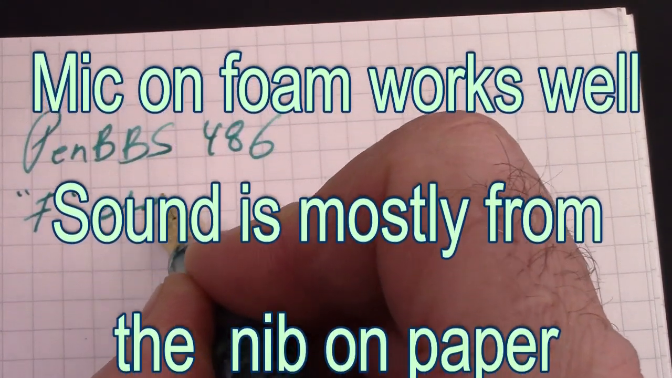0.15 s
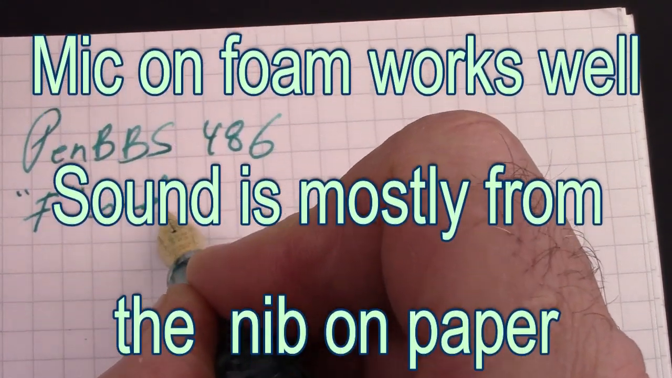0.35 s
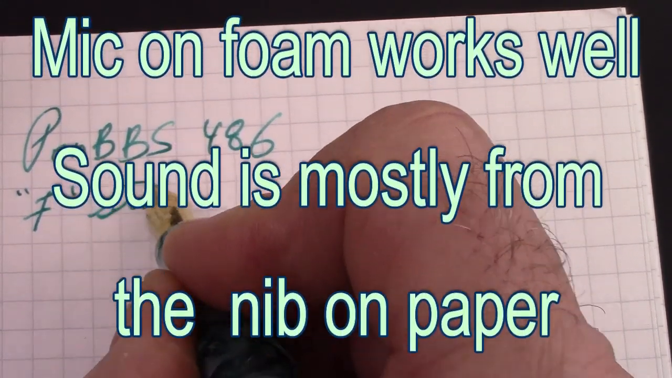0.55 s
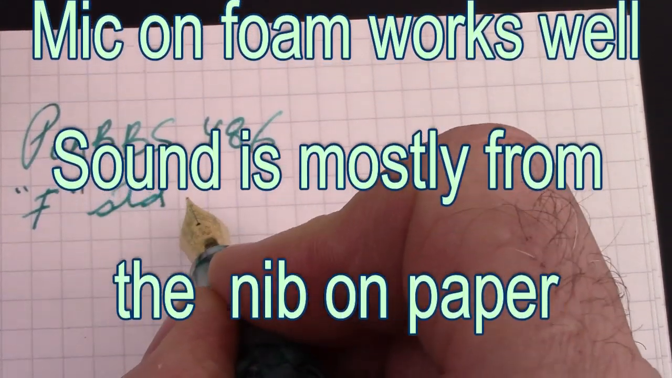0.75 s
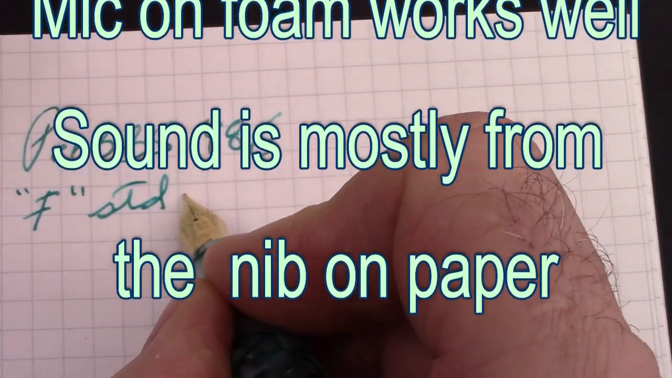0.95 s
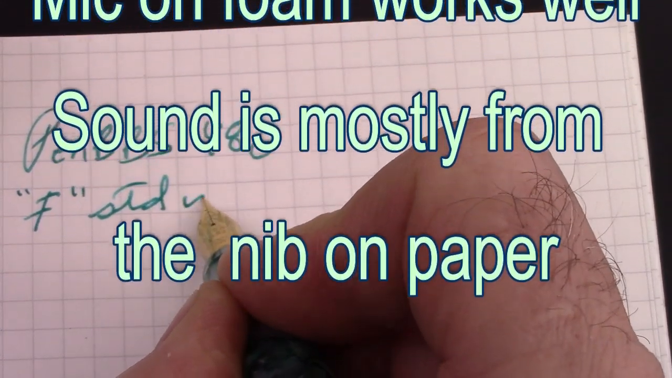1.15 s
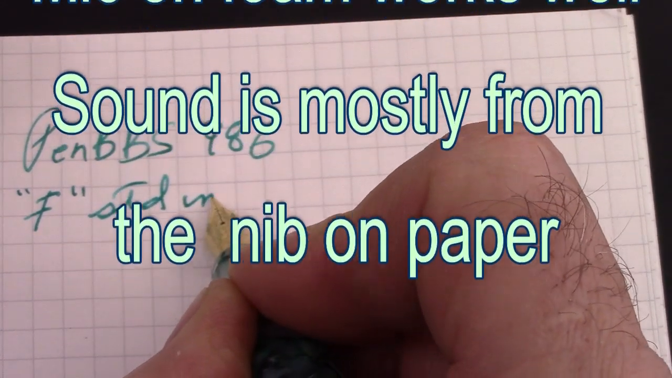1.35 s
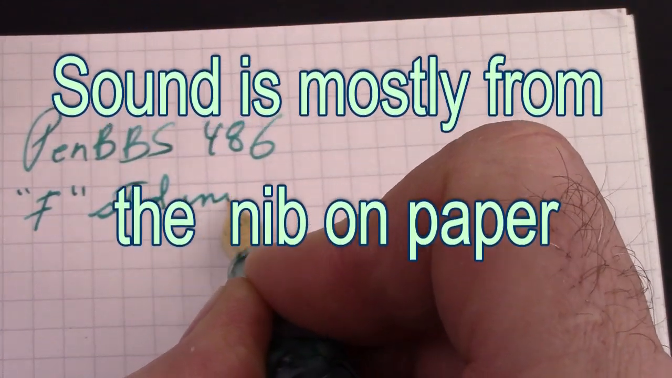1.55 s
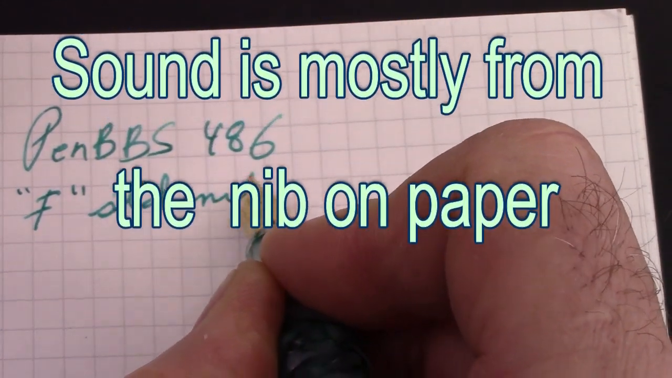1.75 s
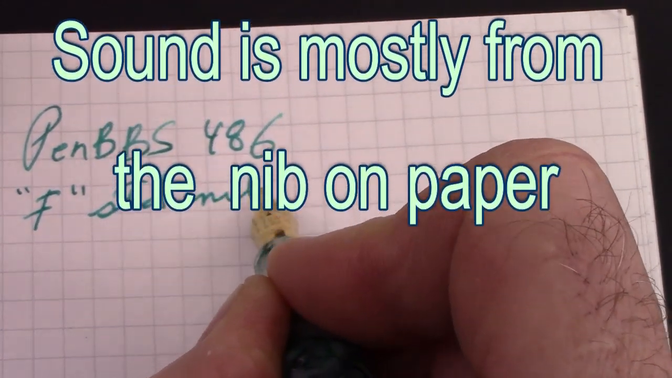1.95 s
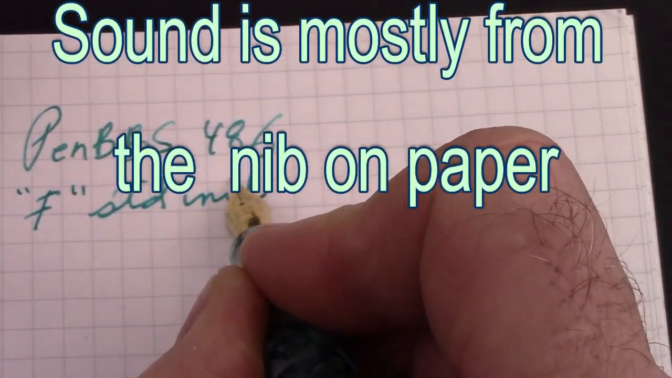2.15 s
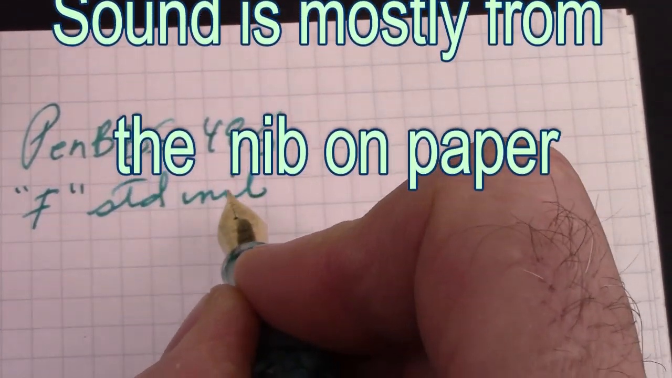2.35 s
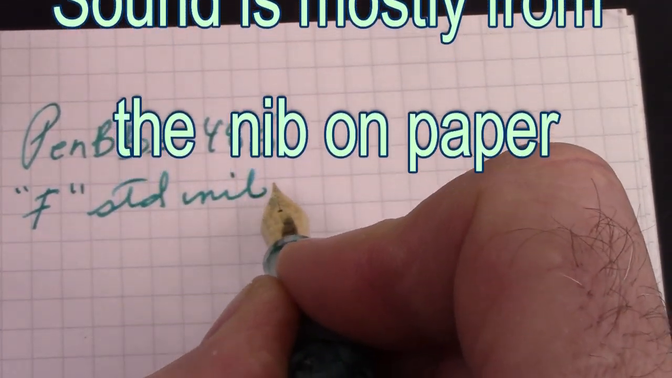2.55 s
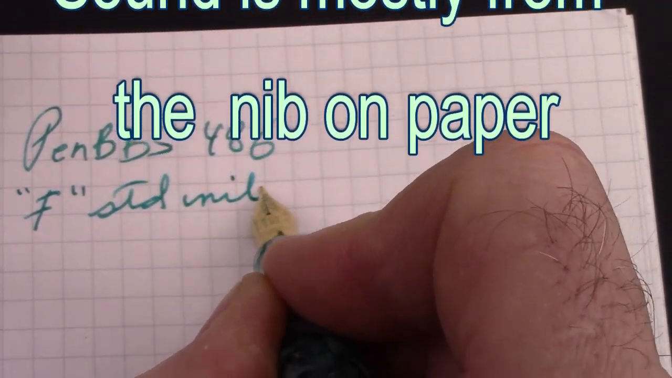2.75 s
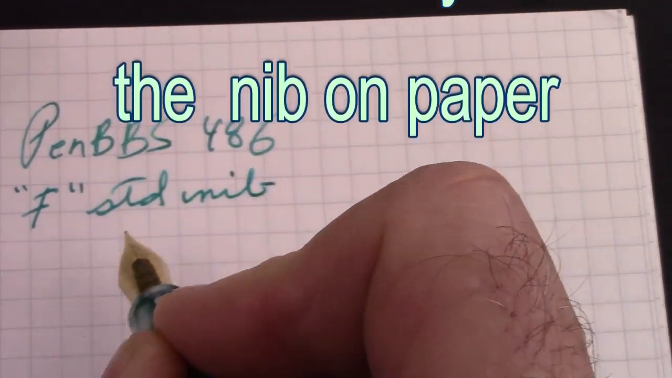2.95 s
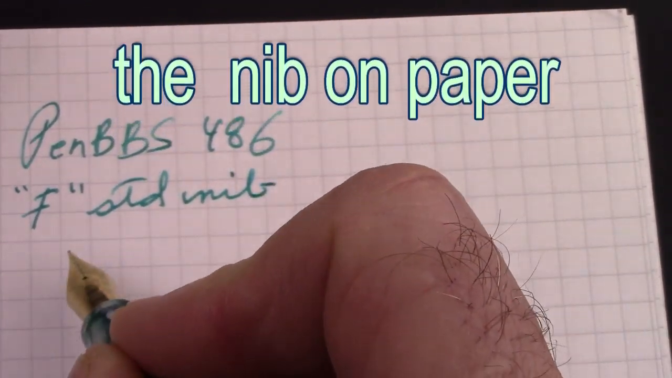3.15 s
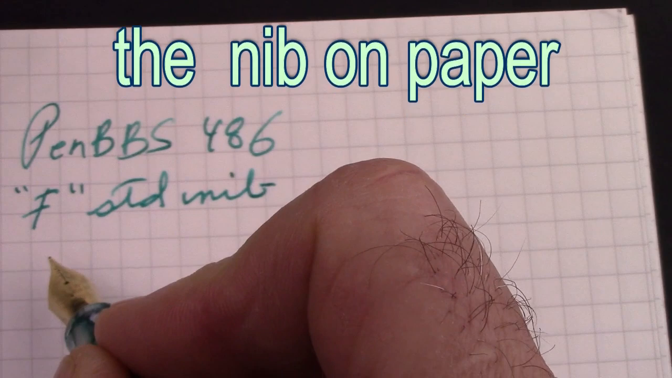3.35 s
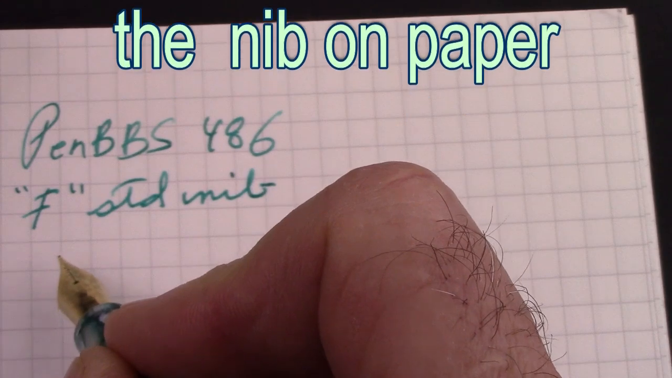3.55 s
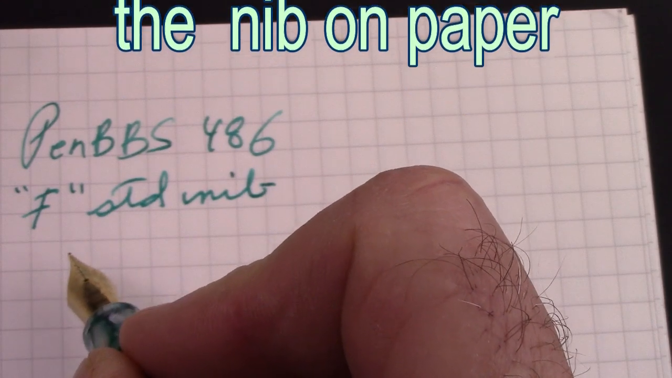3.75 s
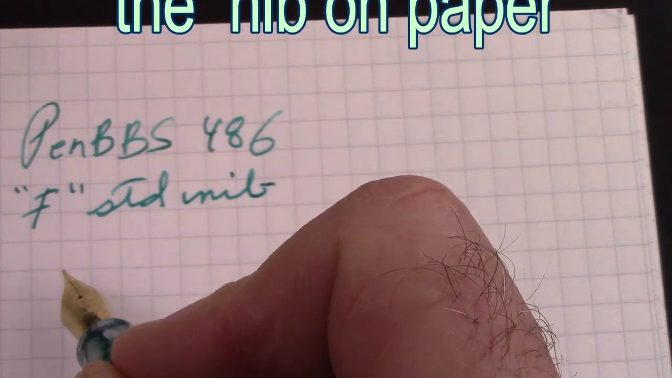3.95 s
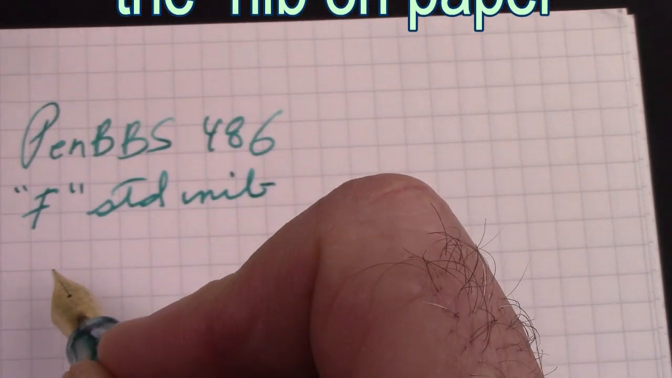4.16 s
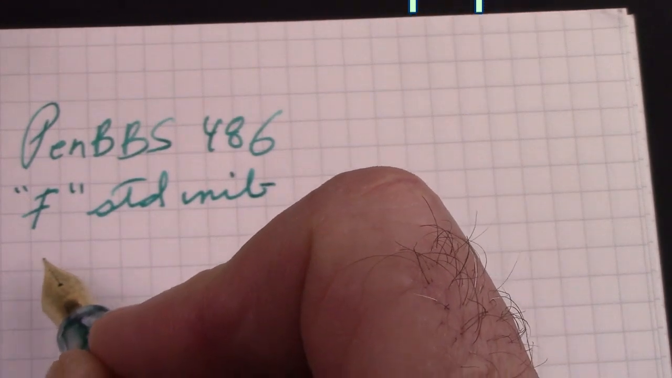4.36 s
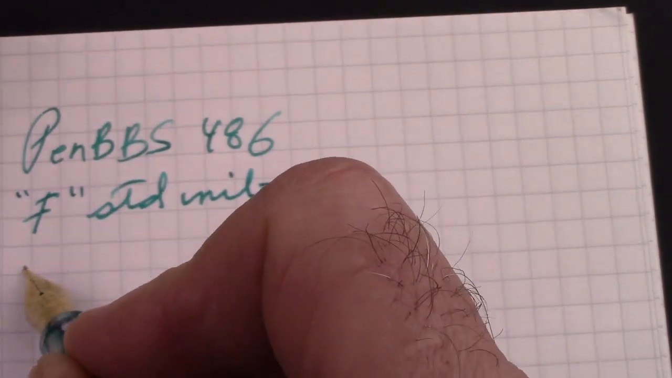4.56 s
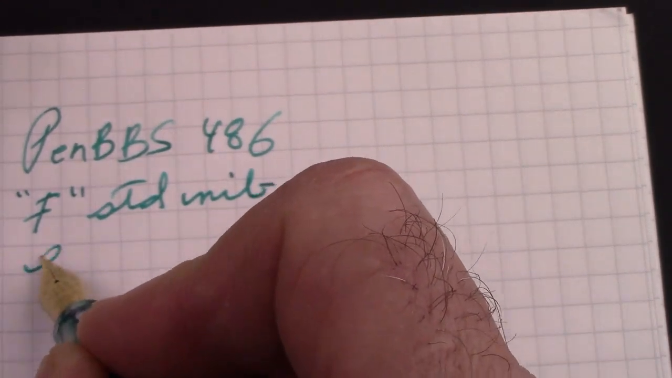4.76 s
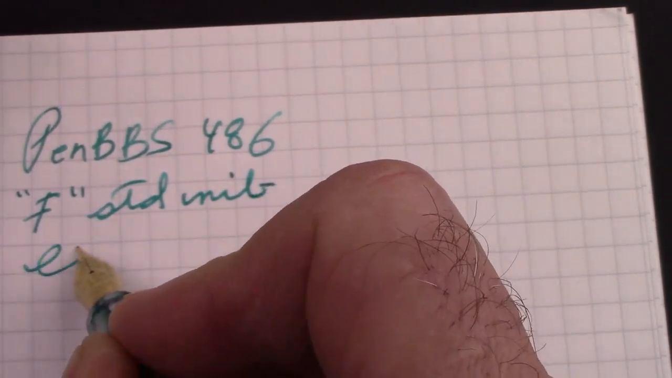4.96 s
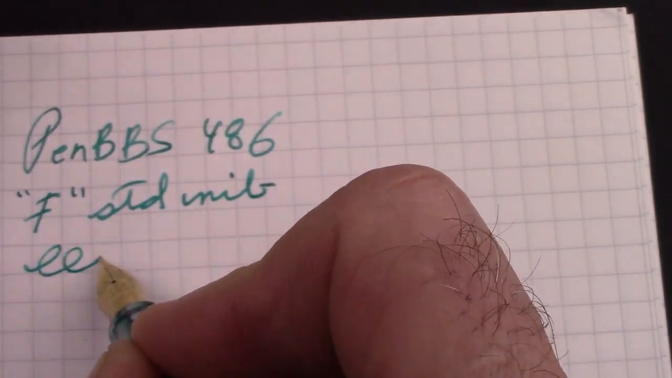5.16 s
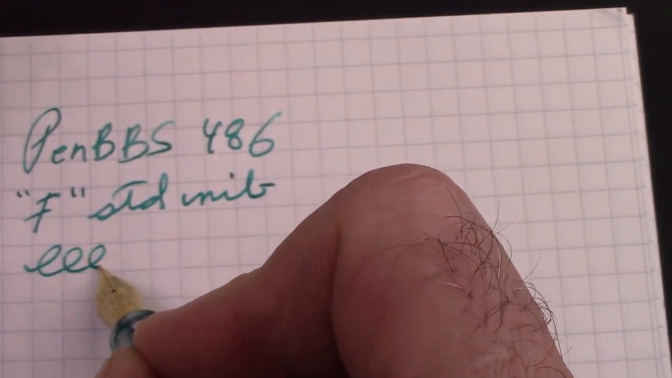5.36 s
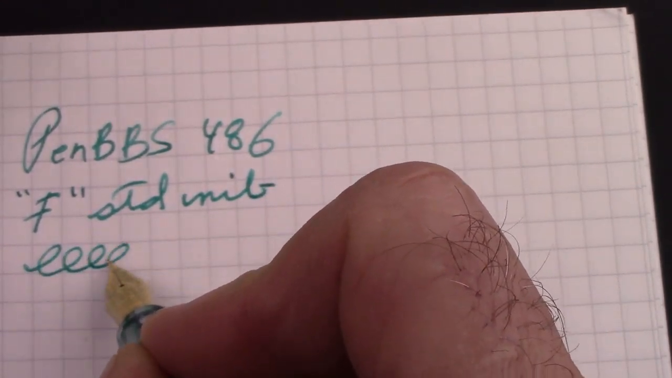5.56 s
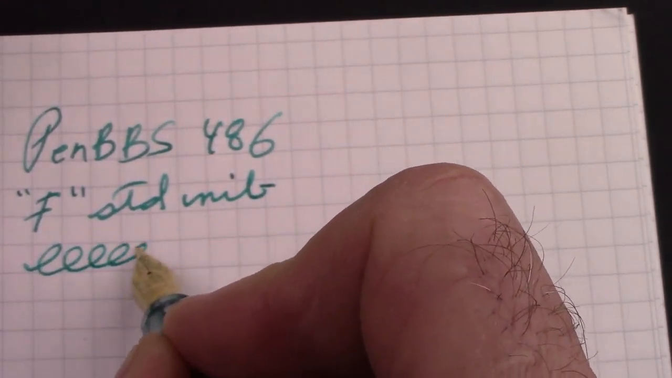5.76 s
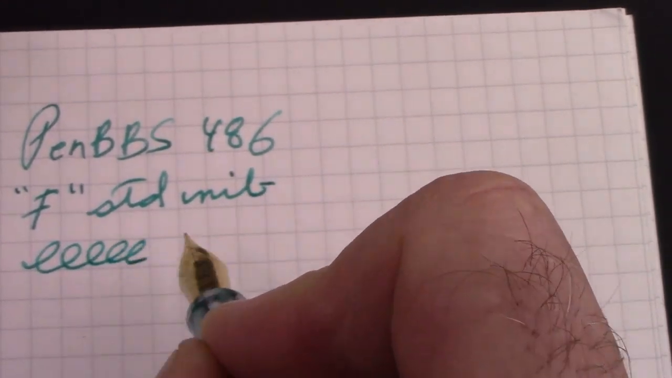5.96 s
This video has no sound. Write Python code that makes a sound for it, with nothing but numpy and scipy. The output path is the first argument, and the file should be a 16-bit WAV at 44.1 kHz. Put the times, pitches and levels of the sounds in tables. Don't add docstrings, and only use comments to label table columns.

```python
import sys
import numpy as np
from scipy import signal
from scipy.fft import rfft, irfft
from scipy.io import wavfile
from scipy.ndimage import uniform_filter1d, map_coordinates

SR = 44100
rng = np.random.default_rng(int(sys.argv[2]) if len(sys.argv) > 2 else 0)


def amplitude_ratio(level_db):
    exponent = np.asarray(level_db, float) / 20
    return 10 ** exponent


def materialize(psi):
    bounded = np.clip(np.atleast_2d(psi).T, -1, 1)
    quanta = np.round(bounded * 32767).astype(np.int16)
    wavfile.write(sys.argv[1], SR, quanta)


N = 264600
T = np.arange(N) / SR
COARSE = T[::40]


def level(x, db):
    return x * amplitude_ratio(db) / np.sqrt(np.mean(x ** 2))


def ring(x, hz, width_hz):
    return signal.lfilter(*signal.iirpeak(hz, hz / width_hz, fs=SR), x)


def walk(rate_hz):
    steps = rng.standard_normal(2000)
    curve = map_coordinates(steps, [COARSE * rate_hz], order=2, prefilter=False)
    return np.interp(T, COARSE, curve) * 1.356


def body(x, modes, patchy_db=0., rate_hz=12):
    out = np.zeros(N)
    for k, (hz, width_hz, db) in enumerate(modes):
        gain = amplitude_ratio(db + patchy_db * walk(rate_hz))
        out += (-1) ** k * gain * ring(x, hz, width_hz)
    return out


def colour(x, points):
    hz, db = np.transpose(points)
    bins_hz = np.maximum(np.fft.rfftfreq(N, 1 / SR), 1)
    gain_db = np.interp(np.log(bins_hz), np.log(hz), db)
    return irfft(rfft(x) * amplitude_ratio(gain_db), N)


def smooth(gains):
    return [np.interp(T, COARSE, g) for g in gains]


def swells(start_s, hold_s, peaks_db, rise_db_s, fall_db_s, bend_db_s2=0.):
    early = np.maximum(start_s[:, None] - COARSE, 0)
    late = np.maximum(COARSE - (start_s + hold_s)[:, None], 0)
    drop_db = rise_db_s * early + fall_db_s * late + bend_db_s2 * (early + late) ** 2
    return np.sqrt(amplitude_ratio(2 * np.array(peaks_db)) @ amplitude_ratio(-2 * drop_db))


def air():
    # frequency in Hz, level in dB per Hz
    floor = [(47, -24), (80, -2.5), (109, -14), (189, -15), (295, -22.5), (351, -19.5), (713, -26.5),
             (971, -28), (2200, -32.5), (5560, -36), (12900, -41), (15700, -46.5)]
    hiss = colour(rng.standard_normal(N), floor)
    return level(amplitude_ratio(.5 * walk(9.8)) * hiss, -48.5)


def fan():
    # frequency in Hz, unsteadiness (x 0.5 dB), level in dB
    hum = [(61.06, 1.5, -43), (122.5, 5.4, -52), (183, 4.0, -58.5), (70.7, 5.0, -49), (1177, 3.7, -72.5)]
    turn_s = np.cumsum(1 + 0.01098 * walk(6)) / SR
    out = np.zeros(N)
    for hz, swell, db in hum:
        clock_s = turn_s if hz < 500 else T
        gain = np.sqrt(2) * amplitude_ratio(db + 0.5 * swell * walk(6.9))
        out += gain * np.sin(2 * np.pi * hz * clock_s)
    return out


def cricket():
    # first chirp in seconds, chirp count, period in seconds, level in dB
    phrases = [
        (.04, 4, .137, -2),
        (.75, 7, .163, -4),
        (1.98, 1, .14, -3),
        (2.21, 3, .14, 0),
        (2.63, 2, .135, -5),
        (2.95, 8, .134, 0),
        (4.02, 3, .134, -5),
        (4.43, 3, .134, -1),
        (4.99, 3, .145, -1),
        (5.73, 2, .15, -1),
    ]
    pulse = np.zeros(len(COARSE))
    for s, count, period_s, db in phrases:
        for k in range(count):
            away_s = abs(COARSE - s - k * period_s)
            pulse += amplitude_ratio(db) * np.clip((.045 - away_s) / 0.015, 0, 1)
    tone = np.sin(2 * np.pi * 5566 * T + 0.78 * walk(36))
    return amplitude_ratio(-64 + .4 * walk(6.8)) * smooth([pulse])[0] * tone


def arm(push):
    # start in seconds, sway in dB, foam bounce in dB, desk top flex in dB
    jolts = [(.15, -39, -45, -32), (0.499, -33, -49, -27.5), (.95, -33, -34, -59), (1.03, -44, -47, -32),
             (.75, -46, -34, -55), (1.2, -38, -39, -45), (1.35, -36, -33, -38.5), (1.48, -44, -33, -47),
             (1.6, -53, -32, -65), (1.8, -54, -33.5, -53), (1.99, -56, -29, -46), (2.08, -30.5, -44, -33),
             (2.16, -44.5, -32, -58), (2.52, -39, -32, -40), (2.38, -43, -38, -37),
             (2.7, -40.5, -33.5, -54), (2.8, -37.5, -46, -38), (3.27, -56, -40, -64), (4.51, -43, -46, -59),
             (4.68, -52, -33, -68), (5.651, -56, -56, -32), (5.8, -38, -37, -46), (5.93, -49, -50, -29.5)]
    still_db, writing_db, lag_s = (-55, -46, -50), (-6, 3, -1), 0.13
    start_s, *peaks_db = np.transpose(jolts)
    jolted = swells(start_s, 0 * start_s, peaks_db, rise_db_s=141, fall_db_s=147)
    lagged = uniform_filter1d(push, size=int(lag_s / COARSE[1]))
    writing = amplitude_ratio(np.array(writing_db))[:, None] * lagged
    return np.hypot(np.hypot(jolted, writing), amplitude_ratio(np.array(still_db))[:, None])


def desk(sway, bounce, flex):
    # start in seconds, peak in dB, push length in seconds, foam rebound in dB
    thumps = [
        (.454, -8.5, .011, -12),
        (.479, -14, .018, -12),
        (.909, -21, .016, 0),
        (1.946, -26, .008, 16),
        (2.052, -15, .011, 4),
    ]
    # frequency in Hz, width in Hz, level in dB
    thud = [(24.6, 9.6, -9.5), (100, 24, -4)]
    push, foam_push = np.zeros(N), np.zeros(N)
    for s, db, length_s, rebound_db in thumps:
        blow = amplitude_ratio(db) * np.sin(np.pi * np.clip((T - s) / length_s, 0, 1)) ** 2
        push += blow
        foam_push += amplitude_ratio(rebound_db) * blow
    rebound = ring(foam_push, 77.0, 13.4)
    rock = level(ring(ring(sway * rng.standard_normal(N), 36.0, 33.0), 41.0, 37.0), -41.0)
    foam_modes = [(67.3, 12.8, 0.5), (78.1, 13.3, -3.0)]  # Hz, width Hz, dB
    foam = level(body(bounce * rng.standard_normal(N), foam_modes), -40.0)
    board = level(ring(ring(flex * rng.standard_normal(N), 103.5, 42.0), 154.0, 72.0), -45.0)
    thump = push - ring(push, 7.6, 37.0) + body(push, thud) + rebound
    return rock + foam + board + thump


def knocks():
    # start in seconds, peak in dB, pitch in Hz, 60 dB decay in seconds
    hits = [(0.092, -40, 221, 0.079), (0.319, -43, 328, 0.017), (0.364, -25, 201, 0.028),
            (0.447, -25.5, 195, 0.074), (0.677, -39, 470, 0.032), (.745, -38, 333, 0.023),
            (0.711, -32, 244, 0.023), (0.931, -29.5, 300, 0.021), (1.14, -25.5, 487, 0.03),
            (1.347, -22.5, 476, 0.011), (1.37, -21, 484, 0.011), (1.448, -33, 304, 0.016),
            (1.492, -40.5, 637, 0.046), (1.758, -35, 234, 0.023), (1.789, -28, 215, 0.034),
            (1.946, -32, 138, 0.065), (2.058, -35, 137, 0.048), (1.786, -21.5, 524, 0.013),
            (2.0482, -19.5, 200, 0.02), (2.655, -38.5, 234, 0.03), (2.933, -18, 239, 0.009),
            (3.04, -20.5, 247, 0.0058), (3.229, -29, 202, 0.011), (3.304, -24.5, 332, 0.013),
            (4.466, -27, 272, 0.024), (4.564, -41, 250, 0.032), (4.715, -36.5, 288, 0.065),
            (4.773, -36, 460, 0.032), (5.503, -32, 323, 0.021), (5.741, -33.5, 396, 0.028),
            (5.08, -32.5, 258, 0.11), (5.908, -26.5, 203, 0.023), (5.956, -26.5, 260, 0.0085)]
    out, t = np.zeros(N + SR), T[:4000]
    for s, db, hz, t60_s in hits:
        fade = (1 - np.exp(-t / 0.00097)) * np.exp(-np.log(1000) * t / t60_s)
        tone = np.sin(2 * np.pi * hz * t)
        tone += amplitude_ratio(-10.5) * np.sin(2 * np.pi * 1.66 * hz * t)
        clack_db = -7 + 5 * np.log2(hz / 480)
        tone += amplitude_ratio(clack_db) * np.exp(-t / 0.0012) * np.sin(2 * np.pi * 1150.0 * t)
        out[int(s * SR):][:4000] += amplitude_ratio(db + 6.0) * fade * tone
    return out[:N]


def ticks():
    # start in seconds, peak in dB, centre in Hz, bright edge in dB
    small_touches = [(0.447, -28, 4530, -35.5), (0.6753, -37.5, 3070, -54), (0.747, -41.5, 3240, -62),
                     (0.901, -34.5, 3020, -41.5), (1.013, -45, 3100, -64), (1.1407, -33.5, 4330, -79),
                     (1.3486, -33, 2800, -49), (1.371, -38.5, 3090, -57), (1.4002, -41, 3510, -59),
                     (1.4489, -40.5, 2980, -57), (1.496, -45, 4670, -62), (1.7874, -35, 4130, -52),
                     (1.854, -36.5, 3660, -58), (1.869, -38, 2700, -54), (2.0437, -30, 3920, -36.5),
                     (2.0994, -41, 6890, -54), (2.676, -42, 5770, -55), (2.995, -42, 3200, -64),
                     (3.051, -42, 2680, -53), (3.129, -40, 3500, -52), (3.1747, -38.5, 3020, -45),
                     (3.231, -47, 5400, -66), (3.306, -35.5, 3800, -49), (3.336, -42, 5600, -64),
                     (4.437, -35, 3740, -37), (4.4668, -38, 4440, -49), (4.497, -48, 3000, -72),
                     (5.106, -31, 3360, -37.5), (5.703, -37.5, 3150, -56), (5.836, -35.5, 3270, -50),
                     (0.933, -41, 890, -67), (1.5637, -43, 1910, -57), (1.748, -40, 1070, -75),
                   (2.0489, -32.5, 960, -48), (2.1234, -43, 1190, -66), (4.249, -43.5, 2030, -66),
                   (4.353, -37.5, 1430, -51), (4.5708, -40, 890, -68), (5.079, -34, 980, -67),
                   (.908, -37.5, 1320, -59), (4.447, -41, 770, -66), (5.9965, -30, 3000, -36),
                     (.0937, -46, 4610, -58), (0.886, -44, 3000, -63), (.915, -44, 3020, -68),
                   (.927, -46, 2300, -60), (1.016, -47, 3900, -64), (1.767, -54, 9000, -55),
                   (1.7853, -43, 1200, -64), (1.8327, -50, 7000, -55), (1.88, -49, 1600, -62),
                   (2.058, -45, 6000, -61), (2.864, -35, 3140, -64), (4.2505, -42.5, 4400, -54),
                   (4.597, -37, 3460, -40), (4.835, -43, 1600, -56), (4.846, -34, 1800, -41),
                   (5.329, -40, 3650, -61), (5.356, -33, 1690, -64), (5.5907, -49, 4620, -58),
                   (5.602, -40, 1500, -48), (5.653, -44, 4800, -66), (5.765, -39, 1680, -66),
                   (5.814, -44, 2500, -62)]
    out, t = np.zeros(N + SR), T[:1500]
    for s, db, hz, edge_db in small_touches:
        noise = rng.standard_normal(1500)
        clatter = (t == 0) + 0.095 * noise ** 2 * np.sign(noise) * np.exp(-t / 0.0031)
        wide = np.clip(1.5 + .04 * (edge_db - db), .45, 1.3)
        mid = ring(ring(clatter, hz, wide * hz), hz, min(2 * wide * hz, .35 * SR))
        edge = ring(ring(clatter * np.exp(-t / .0025), 9500., 12000.), 12500., 14000.)
        touch = amplitude_ratio(db + 5.0) * mid / abs(mid).max() + amplitude_ratio(edge_db + 16) * edge / abs(edge).max()
        out[int(s * SR):][:1500] += touch
    return out[:N]


def pings():
    # start in seconds, peak in dB, pitch in Hz, 60 dB decay in seconds
    flicks = [(.9335, -39, 800, 0.0081), (1.7475, -42, 1100, .01), (4.466, -39, 696, 0.0094),
              (4.249, -45, 1900, .01), (1.8327, -48, 12000, .003), (5.08, -36, 1600, 0.0099),
              (0.4467, -30.5, 1370, 0.0077), (1.7862, -34, 5300, .006), (1.786, -35, 2500, .005),
              (3.162, -46, 990, .008), (3.2315, -46, 5500, .014), (3.2315, -44, 2500, .007),
              (3.306, -39, 1690, .007), (3.318, -46, 3800, .005), (4.4366, -38, 1500, .005),
              (1.076, -45, 1900, .006), (5.389, -42, 3800, .004), (1.011, -44, 2920, .008),
              (1.3483, -36, 2840, .007), (1.4025, -43, 3500, .01), (1.449, -36, 3120, 0.0056),
              (1.4965, -40, 4900, .008), (1.565, -42, 3720, .012), (1.565, -36.5, 1910, 0.012),
              (2.0447, -39, 3600, .007), (2.0495, -40, 1600, .007), (2.0522, -33, 900, 0.0056),
              (2.1225, -34, 1200, 0.0061), (2.6572, -48, 3820, .006), (2.7201, -44.5, 2960, .008),
              (2.762, -45, 3630, .006), (4.4967, -34, 3040, 0.0075), (4.652, -39, 4600, .005),
              (4.846, -34, 3330, 0.009), (4.854, -34, 3340, 0.0093), (5.703, -36.5, 3240, .007)]
    # start in seconds, peak in dB, pitch in Hz
    catches = [(0.092, -40, 1160), (0.127, -31, 1830), (0.14, -29, 1080), (0.225, -45, 759),
               (0.24, -33, 1140), (0.266, -24, 935), (4.571, -22, 904), (4.641, -34, 1630),
               (4.653, -30, 1630), (4.738, -45, 1870), (4.808, -31, 970), (4.821, -33, 1330),
               (4.83, -24, 1620), (4.838, -26, 1660), (4.895, -41, 1650), (4.997, -34, 1630),
               (5.078, -35, 970), (5.145, -38, 1610), (5.27, -33, 1070), (5.335, -37, 1490),
               (5.348, -27, 1740), (5.506, -37, 1750), (5.511, -34, 1180), (5.584, -29, 1020),
               (5.752, -29, 1730), (5.818, -34, 1010), (5.835, -27, 1580)]
    caught = [(s, db - 8, hz, 0.014) for s, db, hz in catches]
    out, t = np.zeros(N + SR), T[:2000]
    for s, db, hz, t60_s in flicks + caught:
        fade = (1 - np.exp(-t / 0.00026)) * np.exp(-np.log(1000) * t / t60_s)
        out[int(s * SR):][:2000] -= amplitude_ratio(db + 5.5) * fade * np.sin(2 * np.pi * hz * t)
    return out[:N]


def played(table, rise_db_s, fall_db_s):
    start_s, hold_s, *peaks_db = np.transpose(table)
    return swells(start_s, hold_s, peaks_db, rise_db_s, fall_db_s, bend_db_s2=6000)


def hand():
    # start in seconds, hold in seconds, push into the pad in dB, fibre scratch in dB
    strokes = [(0.0, 0.038, -41.5, -48.5), (.1, 0.017, -47, -46), (.13, 0.041, -42, -44),
               (.232, 0.049, -36.5, -40.5), (.29, 0.004, -54, -54), (.455, 0.0058, -36, -49),
               (.475, 0.045, -38.5, -43), (.56, 0.017, -44.5, -53), (.62, 0.018, -56, -57),
               (.7, 0.081, -49.5, -56.5), (.91, 0.016, -43, -55), (.96, 0.018, -46.5, -48.5),
               (1.02, .005, -56, -66), (1.055, 0.011, -39, -42.5), (1.14, 0.015, -39.5, -47),
               (1.25, 0.011, -44.5, -48.5), (1.355, 0.013, -42.5, -52), (1.41, 0.017, -43, -51.5),
               (1.5, 0.048, -43, -50), (1.575, 0.053, -38, -46.5), (1.758, 0.021, -36.5, -45),
               (1.795, 0.0043, -36, -42), (1.82, 0.041, -44.5, -49.5), (1.865, 0.0089, -34, -44),
               (1.956, .005, -43.5, -62), (2.055, 0.0065, -39, -49.5), (2.14, 0.11, -51, -54.5),
               (2.776, 0.002, -38.5, -45), (2.868, 0.1, -45, -53), (3.051, .005, -48, -56),
               (3.15, 0.22, -54.5, -56.5), (3.87, 0.083, -56, -57.5), (4.25, 0.029, -54, -74),
               (4.44, 0.036, -46.5, -60)]
    loops = [(4.535, 0.0083, -47, -52), (5.21, .01, -54, -55), (5.46, 0.011, -48, -54),
             (4.59, 0.02, -30.5, -38.5), (4.64, 0.025, -39, -42), (4.74, 0.036, -42, -44.5),
             (4.812, .005, -41, -48), (4.827, 0.021, -34.5, -38.5), (4.86, 0.0059, -33, -52),
             (4.893, 0.006, -42.5, -44), (4.99, 0.066, -41, -46), (4.94, .02, -48, -51.5),
             (5.082, 0.025, -39, -41), (5.112, 0.0043, -34, -38), (5.15, 0.018, -37, -43),
             (5.265, 0.02, -38.5, -44), (5.31, .01, -39, -48.5), (5.24, .005, -46, -51),
             (5.348, 0.011, -34, -38.5), (5.39, 0.019, -37.5, -42.5), (5.51, 0.024, -40, -43),
             (5.59, 0.018, -32, -38.5), (5.635, 0.023, -39, -41), (5.757, 0.021, -35, -40),
             (5.835, 0.015, -35, -41.5), (5.9, 0.042, -45, -50.5)]
    # start in seconds, hold in seconds, hiss in dB, sizzle in dB
    slides = [(.1, 0.065, -59, -61), (.245, 0.015, -52, -65), (.41, 0.0086, -41.5, -50),
              (.475, 0.079, -50, -55.5), (.565, 0.059, -40, -51), (.683, 0.0028, -48.5, -68),
              (.97, 0.0089, -49.5, -62), (1.35, 0.016, -56, -67), (1.56, 0.0085, -54, -66),
              (1.615, 0.016, -52.5, -55.5), (1.85, 0.022, -54, -69), (1.983, 0.017, -42.5, -57),
              (2.06, 0.012, -50, -56), (2.16, 0.019, -53, -66), (2.21, 0.012, -43.5, -54.5),
              (2.285, 0.013, -52, -64), (2.774, 0.0041, -52, -63), (2.871, 0.068, -38.5, -46.5),
              (3.055, 0.004, -56, -60), (3.13, 0.0039, -54, -58), (3.26, 0.077, -56, -74),
              (3.88, 0.046, -45, -59), (4.22, 0.1, -56, -75), (4.45, .01, -54, -58),
              (4.595, 0.011, -64, -54), (4.845, 0.026, -53, -53), (5.108, .012, -62, -59),
              (5.36, 0.029, -47.5, -55.5), (5.6, 0.025, -45, -54.5), (5.86, 0.021, -48, -68),
              (5.91, 0.036, -40, -47.5), (5.97, .03, -49, -55)]
    landings = [
        (.267, 0.015, -38, -62),
        (.388, 0.026, -41, -57),
        (3.03, 0.018, -50, -58),
        (1.141, 0.0056, -40.5, -70),
        (1.496, 0.03, -44, -64),
        (1.786, 0.029, -43.5, -70),
    ]
    push, scratch = np.hypot(played(strokes, 322, 277), played(loops, 322, 275))
    sliding = np.hypot(played(slides, 420, 387), played(landings, 4000, 420))
    under_scratch_db = np.array([[-10], [-17.5]])
    hiss, sizzle = np.hypot(sliding, amplitude_ratio(under_scratch_db) * scratch)
    rest_db = np.array((-64, -69.5, -66, -69))
    return np.hypot([push, scratch, hiss, sizzle], amplitude_ratio(rest_db)[:, None])


def fibres(rate_hz, spread_db):
    snaps = rng.random(N) < rate_hz / SR
    size = np.minimum(rng.exponential(size=N), 4.5)
    return snaps * rng.standard_normal(N) * amplitude_ratio(spread_db * size)


def nib(push, scratch, hiss, sizzle):
    # frequency in Hz, width in Hz, level in dB
    pad_modes = [(215, 43.4, 2.5), (361, 97, -4.5), (468.5, 64, -1), (666, 170, -9.5)]
    pen_modes = [(923, 250, 2.5), (1290, 330, 3), (1600, 305, 2), (1830, 200, 3), (2180, 320, -6),
                 (3620, 220, -17)]
    slide_modes = [(1900, 253, 8), (3125, 630, 7.5), (4240, 1130, 4.5), (4800, 470, 9.5), (6500, 2500, -12),
                   (6800, 500, -29)]
    tip_modes = [(7000, 640, -0.5), (9930, 470, 4.5), (10400, 540, -5), (11600, 250, 6), (12800, 600, -3.5),
                 (13400, 620, 5.5), (14700, 900, -2)]
    tine_modes = [(1580, 260, 1.7), (1890, 220, 2.5)]
    barrel_modes = [(900, 194, 4), (1290, 340, -2), (2090, 160, -7.5), (2550, 480, -11.5),
                    (3320, 240, -5.5)]

    coarse = amplitude_ratio(1.94 * walk(90)) * fibres(1500, spread_db=0.5)
    fine = amplitude_ratio(1.0 * walk(150)) * fibres(15000, spread_db=2.5)

    pad = body(coarse * push, pad_modes, patchy_db=1.5, rate_hz=40)
    pad = level(ring(pad, 303.0, 1030.0), -45.0)

    drag = (level(coarse, -4.5) + level(fine, -7.0)) * scratch
    flat_grip = (T > 4.52) | (T < .2)
    looped = drag * flat_grip
    pressure = (scratch / amplitude_ratio(-36)) ** 0.49
    barrel = body(looped * pressure, barrel_modes, patchy_db=1.0, rate_hz=38)
    pen = body(drag - looped, pen_modes, patchy_db=1.3, rate_hz=40)
    pen += body(looped, tine_modes, patchy_db=2.0, rate_hz=25) - barrel
    pen = level(pen - 0.58 * ring(pen, 3100.0, 870.0), -48.5)

    slide = body(fine * hiss, slide_modes, patchy_db=0.6)
    slide = level(slide - 0.55 * ring(slide, 2450.0, 380.0), -52.0)

    pressed = scratch ** 2 / (scratch ** 2 + amplitude_ratio(10.) * hiss ** 2)
    tines = body(fine * sizzle * np.sqrt(pressed), tip_modes, patchy_db=1.5)
    sheet = ring(fine * sizzle * np.sqrt(1 - 0.53 * pressed), 9300.0, 6700.0)
    return pad + pen + slide + level(amplitude_ratio(3.5) * tines + sheet, -56.5)


def scene():
    # frequency in Hz, level in dB
    wide = [(25, -24), (60, -44), (200, -27), (400, -21.5), (800, -16.5), (3000, -10), (15000, -9)]
    motion = hand()
    background = air() + fan() + cricket()
    contacts = desk(*smooth(arm(motion[0]))) + knocks() + ticks() + pings()
    mid = background + contacts + nib(*smooth(motion))
    side = colour(air(), wide)
    return np.array([mid + side, mid - side])


def low_pass(x):
    return signal.sosfilt(signal.butter(12, 16670, fs=SR, output="sos"), x)


def record(dry):
    steep = signal.ellip(10, .3, 26, 15680, fs=SR, output="sos")
    cut = signal.sosfilt(steep, dry)
    return low_pass(cut)


dry = scene()
out = record(dry)
materialize(out)
```